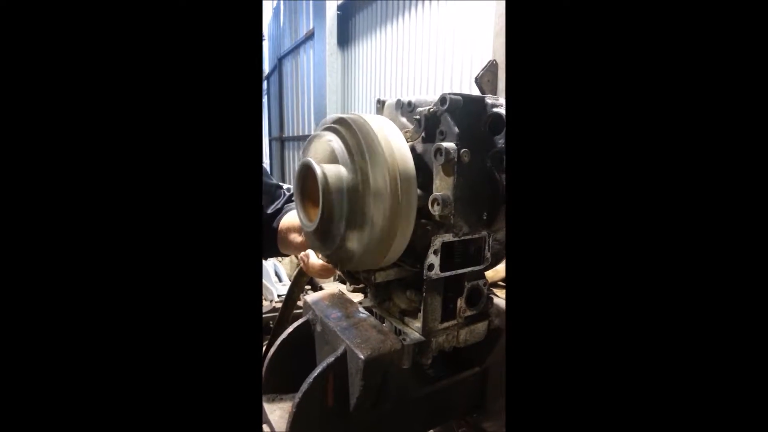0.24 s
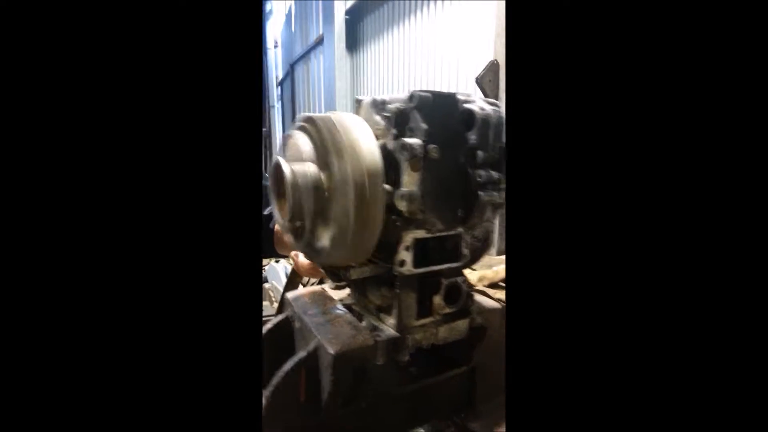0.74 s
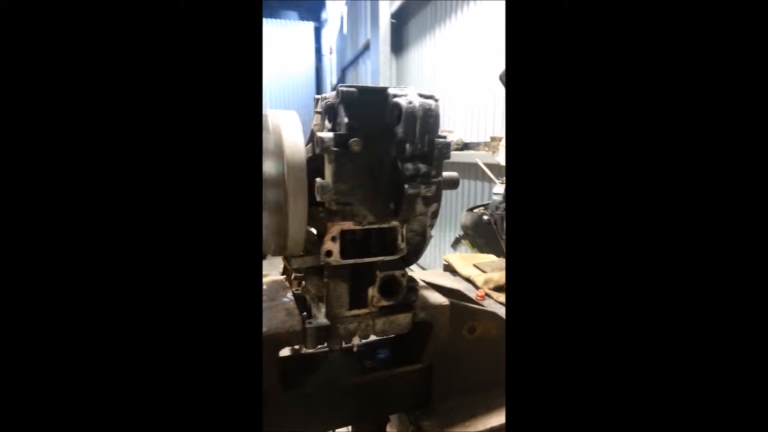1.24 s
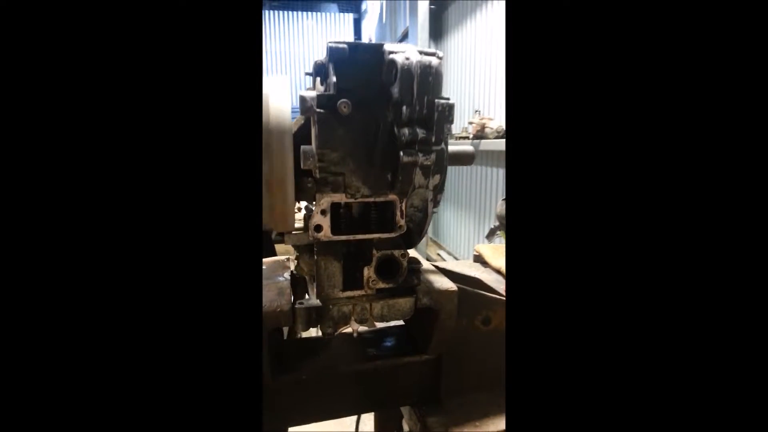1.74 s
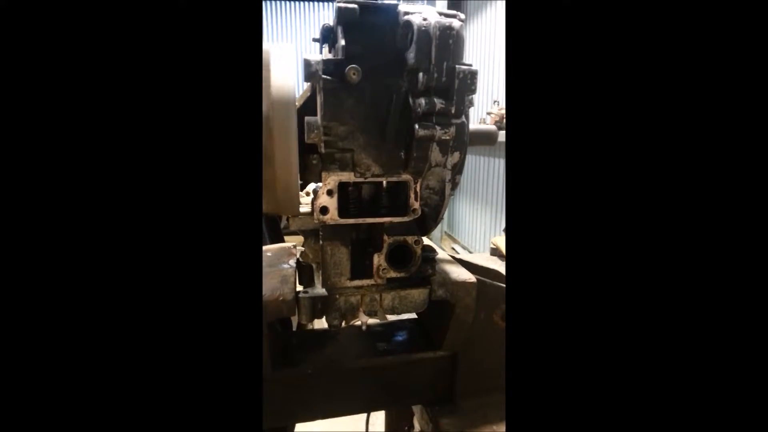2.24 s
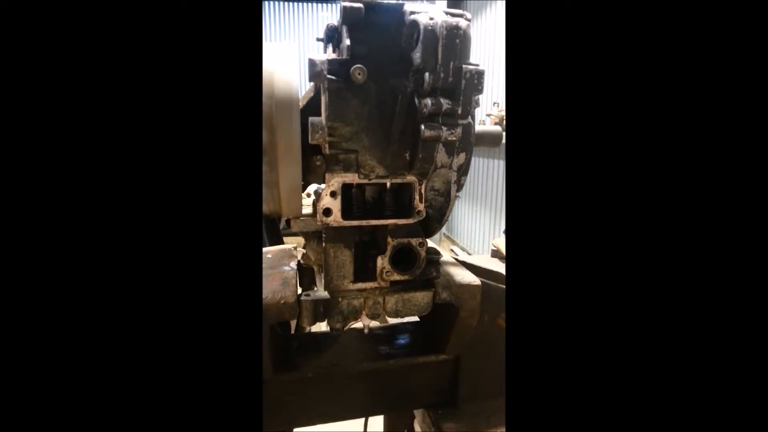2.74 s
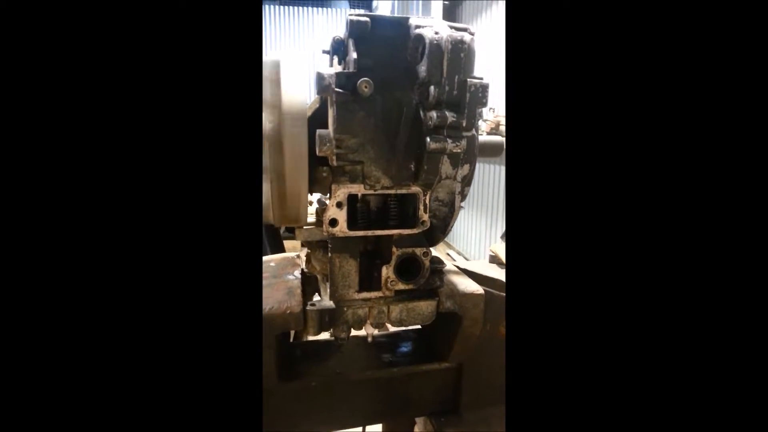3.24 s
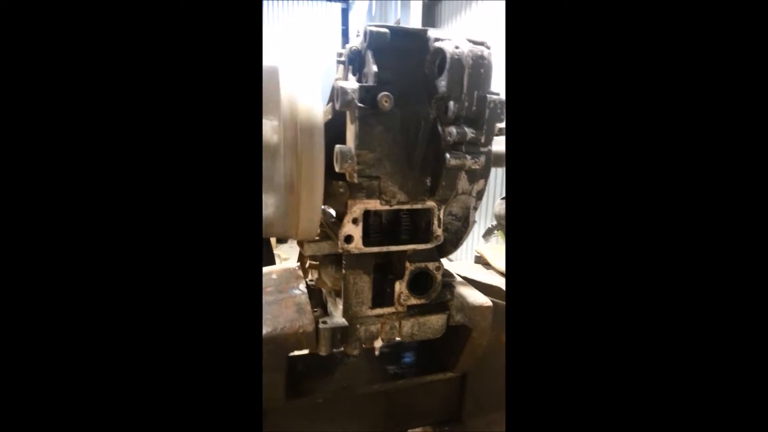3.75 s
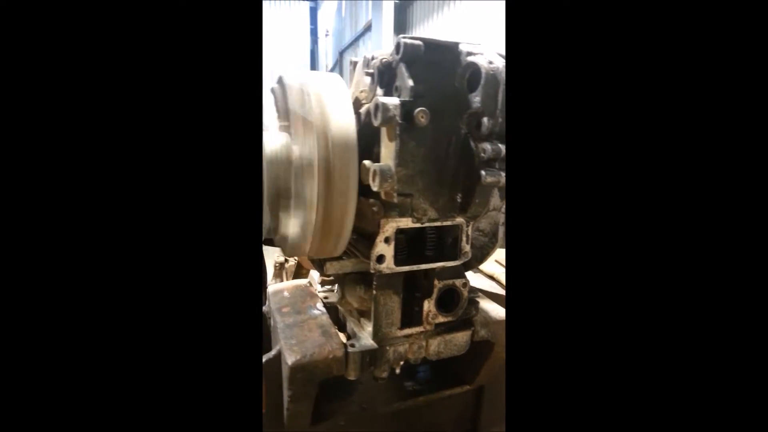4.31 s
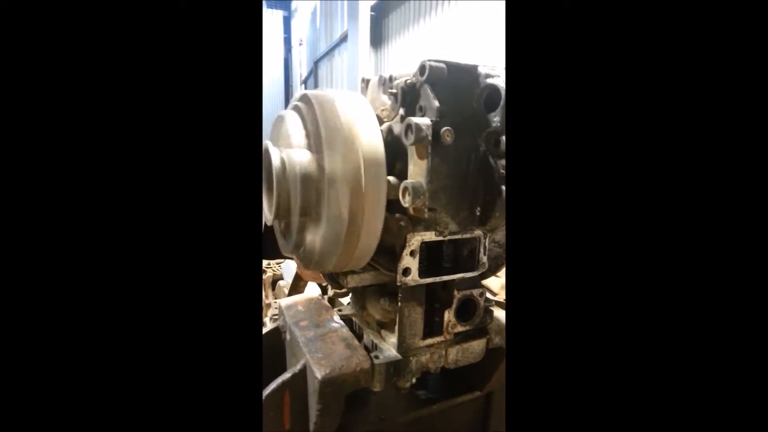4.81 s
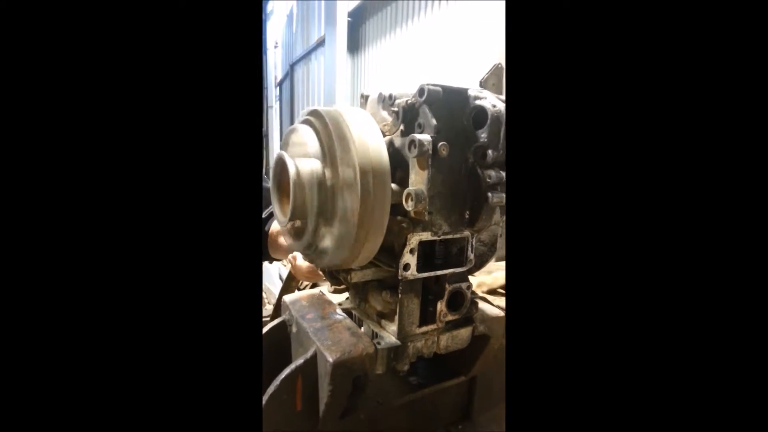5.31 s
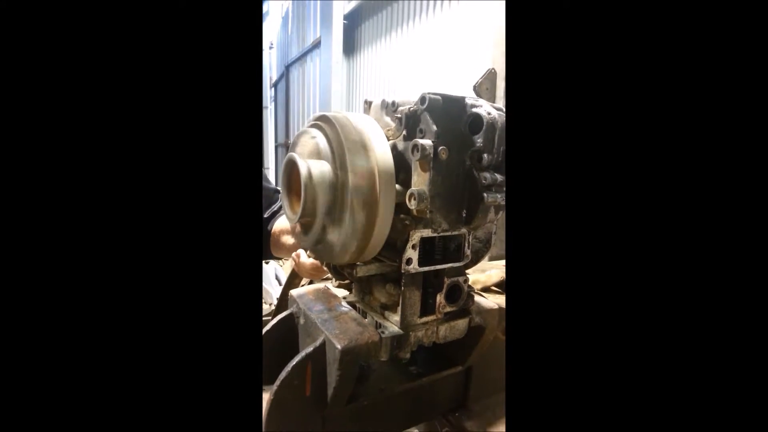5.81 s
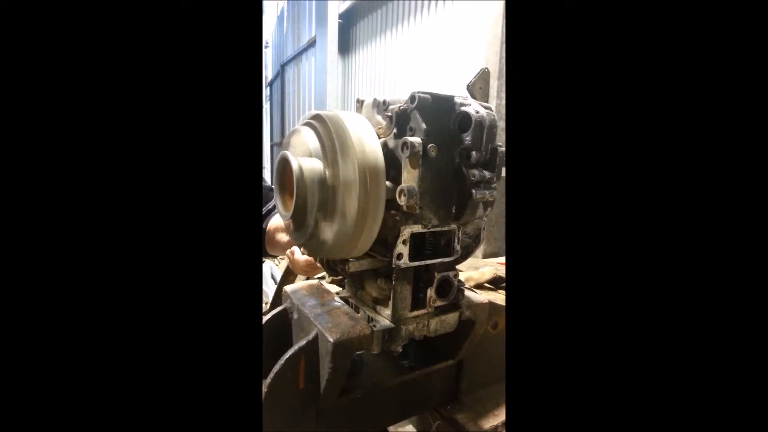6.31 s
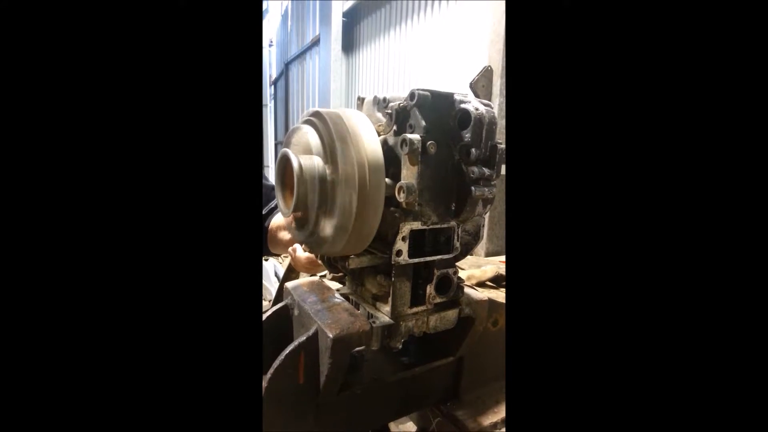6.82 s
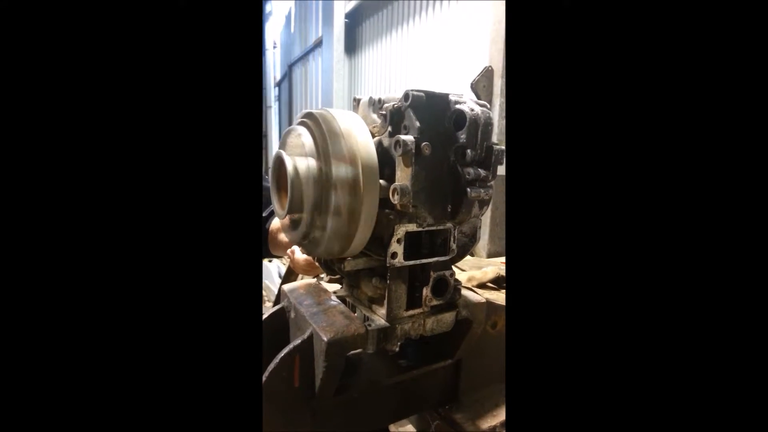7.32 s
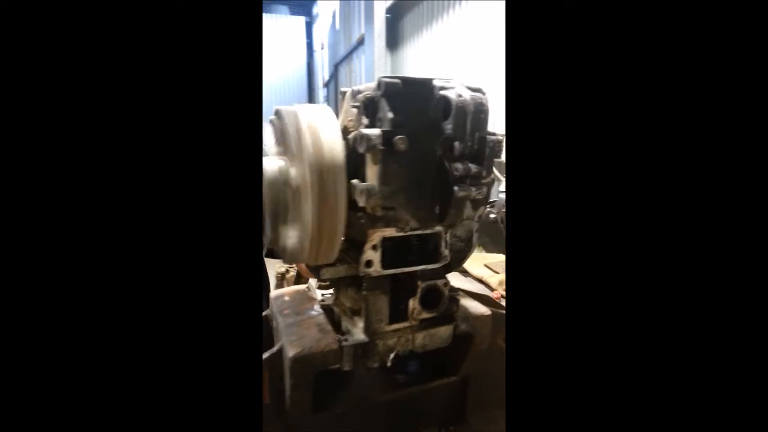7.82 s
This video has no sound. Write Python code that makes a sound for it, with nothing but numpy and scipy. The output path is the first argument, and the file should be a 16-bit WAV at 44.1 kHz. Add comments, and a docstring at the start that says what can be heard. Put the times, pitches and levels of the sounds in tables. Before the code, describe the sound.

Rapid, rhythmic bursts of hissing air from a turning engine in a tin shed, harsh and steady, with windy thumps midway as the microphone moves.

```python
"""Engine block turning on compressed air

A small single-cylinder engine block turns over steadily on compressed air in a tin shed.
In each four-stroke cycle four gusts of air hiss as shaped noise, ring the ports and whistle in a hollow.
Valve gear knocks decaying modes out of the block, and short echoes comb the sound.
The hand-held microphone swings to the open side, where puffs buffet it as low noise, and back to the flywheel.
"""
import sys
import numpy as np
from scipy import signal
from scipy.fft import rfft, irfft
from scipy.io import wavfile
from scipy.ndimage import uniform_filter1d, minimum_filter1d, map_coordinates

SR = 44100
rng = np.random.default_rng(int(sys.argv[2]) if len(sys.argv) > 2 else 0)


def wav_record(signal):
    """Record a signal, one row per channel, as 16-bit PCM in the file named by sys.argv[1]."""
    frames = np.transpose(np.atleast_2d(signal))
    bounded = np.clip(frames, -1, 1)
    # unit amplitude maps onto the largest positive 16-bit level
    quanta = np.round(bounded * 32767).astype(np.int16)
    wavfile.write(sys.argv[1], SR, quanta)


N = 355446
TIME = np.arange(N) / SR
WINDOW, HOP = 1024, 256  # short-time spectra [samples]
FRAMES = N // HOP + 5
BINS = np.fft.rfftfreq(WINDOW, 1 / SR)  # [Hz]


def amp(db):
    """Level law: decibels to amplitude gain."""
    return 10 ** (np.asarray(db) / 20)


def unit(x):
    """Normalization: scales a signal to rms 1."""
    return x / np.sqrt(np.mean(x ** 2) + 1e-20)


def over_time(table):
    """Linear interpolation of a (time, value) table at every sample."""
    return np.interp(TIME, *np.transpose(table))


def over_hz(table):
    """Interpolation over log frequency, one row for each column after the first."""
    hz, *columns = np.transpose(table)
    return np.array([np.interp(np.log(BINS + 1), np.log(hz + 1), column) for column in columns])


def humps(modes):
    """Resonance: the gain of steep-sided peaks, added in power."""
    power = 0
    for hz, width_hz, db in modes:
        gain = amp(db) / (1 + (2 * (BINS - hz) / width_hz) ** 2)
        power = power + gain ** 2
    return np.sqrt(power)


def white_spectra():
    """White noise: two unrelated sets of random short-time spectra."""
    z = rng.standard_normal((FRAMES, len(BINS), 4)).T
    return z[:2] + 1j * z[2:]


def to_sound(spectra):
    """Fourier synthesis: overlapping short-time spectra become a sound of rms 1."""
    sound = signal.istft(spectra, nperseg=WINDOW, noverlap=WINDOW - HOP)[1]
    return unit(sound[:, :N])


def eddies(rate_hz):
    """Turbulence: low-passed random wavering of rms 1, up to about the given rate."""
    hz = np.fft.rfftfreq(N, 1 / SR)
    spectrum = rfft(rng.standard_normal(N)) / (1 + (hz / rate_hz) ** 4)
    return unit(irfft(spectrum, N))


# Speed of the flywheel: (time [s], speed [turns per minute])
FLYWHEEL_SPEED = [(0, 510.6), (0.7, 509.1), (2.5, 515.7), (3.3, 514.1), (4.3, 516.6), (5.4, 514.0),
                  (6.1, 518.3), (6.6, 514.9), (8.06, 515.9)]
START_SHARE = 0.0334  # how far into its cycle the engine is at first [cycles]


def crank():
    """Four-stroke kinematics: cycles done so far, at two turns of the flywheel each."""
    return START_SHARE + np.cumsum(over_time(FLYWHEEL_SPEED)) / (2 * 60 * SR)


def opening(cycle, opens, attack, hold, release):
    """Valve lift: 0 shut to 1 open in every cycle; it lifts, dwells and seats again."""
    age = (cycle - opens) % 1
    rising = age / attack
    falling = (attack + hold + release - age) / release
    return np.clip(np.minimum(rising, falling), 0, 1)


# The four gusts of every cycle: (opens at [cycles], attack [cycles], hold [cycles], release [cycles],
# jet hiss [dB], port ring [dB], whistle [dB])
VALVE_GUSTS = [(-.018, 0.029, 0.06, 0.021, -5.5, -8, -15.5), (0.236, 0.034, 0.12, 0.06, -4.5, -7.5, -15.5),
               (.555, 0.016, 0.026, 0.013, -8.5, -13.5, -18), (0.721, 0.047, 0.076, 0.053, -4.5, -7.5, -14)]
GUST_SCATTER_DB, GUST_SLACK = 2.4, 0.21  # spread of strength [dB] and of timing [share of attack]
# Air leaking between the gusts until the supply shuts:
# (opens at [cycles], attack [cycles], hold [cycles], release [cycles])
SUPPLY_LEAK = (-.016, .012, 0.861, 0.136)
LEAK_DB, LEAK_SAG_DB, SEEP_DB = -12.5, -3, -18.5  # leak, its change over a cycle, and a constant seep [dB]
LEAK_PORT_DB, LEAK_WHISTLE_DB = -1.5, -16.5  # port ring and whistle relative to leak and seep [dB]
# The hollow starts to whistle once a cycle and is cut off:
# (opens at [cycles], attack [cycles], hold [cycles], release [cycles])
HOLLOW_WHISTLE = (0.328, 0.076, 0.174, 0.016)
WHISTLE_DB = -12.5


def flow(cycle):
    """Incoherent addition: leak, gusts and whistle sum in power to jet, port and whistle levels [dB]."""
    sag_db = LEAK_SAG_DB * ((cycle - SUPPLY_LEAK[0]) % 1)
    leak = amp(LEAK_DB + sag_db) * opening(cycle, *SUPPLY_LEAK)
    shares = amp([0, LEAK_PORT_DB, LEAK_WHISTLE_DB]) ** 2
    power = np.outer(shares, leak ** 2 + amp(SEEP_DB) ** 2)
    for opens, attack, hold, release, *levels_db in VALVE_GUSTS:
        # each gust keeps one random strength and lateness throughout
        chance = rng.standard_normal((int(cycle[-1]) + 3, 2))
        strength, late = chance[(cycle - opens + 1.5).astype(int)].T
        lift = opening(cycle - GUST_SLACK * attack * late, opens, attack, hold, release)
        power += np.outer(amp(levels_db), lift * amp(GUST_SCATTER_DB * strength)) ** 2
    power[2] += (amp(WHISTLE_DB) * opening(cycle, *HOLLOW_WHISTLE)) ** 2
    return 10 * np.log10(power)


# Microphone position: (time [s], position [0 at the flywheel to 1 at the open side])
MIC_SWING = [(0, 0), (.7, 0), (1.3, 0.27), (1.7, 0.55), (2.1, 0.808), (2.6, 0.78), (3.3, 0.8), (3.8, 0.63),
             (4.2, 0.305), (4.8, 0.12), (5.4, 0.089), (7.5, 0.021), (8.06, 0.18)]
# How the engine reaches the two ports of the microphone at each end of the swing:
# (frequency [Hz], level [dB], left minus right [dB], likeness [0-1], left lead [rad])
FLYWHEEL_PATH = [(300.0, -2.5, 2.5, 0, -1.1), (1300.0, 0.0, 0.4, 0.57, 1), (1800.0, -0.2, 8, 0.75, -0.14),
                 (2140, 1, 0.4, 0.36, -1.8), (3000, -0.5, -1.3, 0.56, -0.24), (3520, 1.2, 3.4, 0.79, -4),
                 (4050, -0.4, 1.5, 0.58, -4.5), (4530, 0.9, -0.4, 0.62, -5.5), (5550, 0.3, -2, 0.6, -6.0),
                 (6500, -1.2, -11, 0.28, -5), (7420, -1, -3.1, 0.65, -10.5), (8850, -0.6, -3.5, 0.25, -11),
                 (10200.0, -0.4, -2.5, 0.35, -16.5), (11000.0, 1.2, 1, 0.66, -17),
                 (12100, -1, -4.5, 0.2, -14.5), (14200, -1.5, -3.1, 0.57, -20)]
OPEN_SIDE_PATH = [(300.0, 2, -6, 0.05, 2), (1300.0, 1.4, 1, 0.74, 1.7), (1780, 2.5, 11, 0.97, -1.8),
                  (2190, 0.8, 2, 0.6, -1.7), (2900.0, -1, 0, 0.35, -3), (3500, -0.9, -2, 0.81, -5.5),
                  (3860, -0.7, -0.5, 0.23, -6.5), (4500, -3, -4, 0.25, -7.0), (5400.0, 6, -10, 0.65, -8.5),
                  (6500, 1.3, -11.5, 0.11, -7), (7260, 5, -0.8, 0.93, -14), (9000, 1.2, -3.5, 0.3, -16),
                  (10200.0, 1.2, -0.6, 0.11, -19.5), (11000.0, 1, -5, 0.29, -22.5),
                  (12000.0, 0.5, -5, 0.06, -19.2), (14400.0, 0.5, 0.5, 0.24, -14.5)]


def paths():
    """Interaural-type coherence: level, phase and likeness weights to two ports as the microphone swings."""
    swing = np.interp(np.arange(FRAMES) * HOP / SR, *np.transpose(MIC_SWING))
    near_flywheel = over_hz(FLYWHEEL_PATH)[..., None] * (1 - swing)
    near_open_side = over_hz(OPEN_SIDE_PATH)[..., None] * swing
    db, balance_db, likeness, lead = near_flywheel + near_open_side
    likeness = np.clip(likeness, 0, 1)
    right = amp(db) / np.sqrt(1 + amp(balance_db) ** 2)
    left = right * amp(balance_db)
    return left, right * likeness * np.exp(-1j * lead), right * np.sqrt(1 - likeness ** 2)


def rush(colour, path):
    """Turbulent jet noise of one colour: partly direct, partly scattered by the shed."""
    direct, scattered = white_spectra()
    left, right, right_scattered = path
    sides = np.array([left * direct, right * direct + right_scattered * scattered])
    return to_sound(colour[:, None] * sides)


def cylinder(drive, cycle_share, low_hz=1800, high_hz=5700, width_hz=700, top=0.17, spread=0.1333):
    """Cavity resonance: the space over the piston rings higher as it shrinks, twice a cycle."""
    from_top = (cycle_share - top + 0.25) % 0.5 - 0.25
    hz = low_hz + (high_hz - low_hz) * np.exp(-abs(from_top / spread) ** 6)
    # a gliding resonance: shift the drive down to 0 Hz, smooth it, shift it back
    carrier = np.exp(2j * np.pi * np.cumsum(hz) / SR)
    r = np.exp(-np.pi * width_hz / SR)
    ring = signal.lfilter([(1 - r) ** 2], [1, -2 * r, r * r], drive / carrier)
    return unit((carrier * ring).real)


# Colour of the escaping jet: (frequency [Hz], spectral density [dB per Hz])
JET_COLOUR = [(120.0, -56), (300.0, -36), (600.0, -10), (1100.0, -6.5), (1800.0, 2), (2600.0, -0.7),
              (3300.0, -0.15), (3800.0, -5.1), (4600.0, -13), (6000.0, 2), (7500.0, -3), (9500.0, -6),
              (12000.0, -7), (14500.0, -8)]
# Resonances of the open ports: (frequency [Hz], width [Hz], level [dB])
PORT_MODES = [(3957, 970, 0), (5234, 1160, -2), (6730, 1200, -5.5)]
# Resonances of the whistling hollow: (frequency [Hz], width [Hz], level [dB])
HOLLOW_MODES = [(1802, 350, 1), (4500, 470, -6)]
# Colour of the low push of a strong gust: (frequency [Hz], spectral density [dB per Hz])
PUSH_COLOUR = [(60, -40), (120, -23), (190, -2.5), (450, 3.5), (900, -8), (1800, -5.5), (3000, -31)]


def air(cycle_share, jet_db, port_db, whistle_db, push_db=-14, choke_db=-6, lump_db=3):
    """Flow-excited resonance: gusts hiss, ring the cylinder and the ports, and blow across the hollow."""
    path = paths()
    jet_colour = amp(over_hz(JET_COLOUR)[0])
    ring = amp(-14) * cylinder(rush(jet_colour, path), cycle_share)
    jet = amp(jet_db) * (rush(jet_colour, path) + ring)
    ports = amp(port_db) * rush(humps(PORT_MODES), path)
    whistle = amp(whistle_db) * rush(humps(HOLLOW_MODES), path)
    # the low push grows with the cube of the flow until the port chokes, so strong gusts carry it
    push_level_db = push_db + 3 * np.minimum(jet_db, choke_db) + lump_db * eddies(20)
    push = amp(push_level_db) * rush(amp(over_hz(PUSH_COLOUR)[0]), path)
    flutter = amp(0.9 * eddies(200))
    return (jet + ports + whistle + push) * flutter


# Knocks of the valve gear in every cycle: (time [share of the cycle], relative force [dB])
VALVE_KNOCKS = [(.036, -31), (0.301, -23), (0.346, -28.5), (.408, -28.5), (.585, -27.5), (0.809, -33.5)]
# What the block rings with: (frequency [Hz], relative level [dB], t60 [s])
BLOCK_MODES = [(231, -36, 0.031), (351, -0.5, 0.079), (502, -0.5, 0.037), (745, -2, 0.036),
               (1050, 4, 0.025)]


def valve_gear(cycle):
    """Modal impact: cams and tappets knock the block near fixed crank angles, never twice quite alike."""
    scatter_db, slack_s = 2.2, 0.0007  # spread of force and of timing
    share, force_db = np.transpose(VALVE_KNOCKS)
    due = (np.arange(int(cycle[-1]) + 1)[:, None] + share).ravel()
    times = np.interp(due[due < cycle[-1]], cycle, TIME)
    chance = rng.standard_normal((len(times), 2 + 2 * len(BLOCK_MODES)))
    at = np.clip(np.round((times + slack_s * chance[:, 0]) * SR).astype(int), 0, N - 1)
    force = amp(np.resize(force_db, len(times)) + scatter_db * chance[:, 1])
    t = np.arange(SR // 4) / SR
    swell = 1 - np.exp(-t / 0.0022)  # the casting takes a moment to start ringing
    out = np.zeros((2, N))
    for k, (hz, db, t60) in enumerate(BLOCK_MODES):
        # every knock strikes each mode differently on each side
        grip = 0.22 + 0.5 * chance[:, 2 + 2 * k:4 + 2 * k].T
        blows = np.zeros((2, N))
        blows[:, at] = force * grip
        mode = swell * amp(db - 60 * t / t60) * np.sin(2 * np.pi * hz * t)
        out += signal.oaconvolve(blows, mode[None], axes=1)[:, :N]
    return out


# Echoes off the bench and the tin walls:
# (delay at the flywheel [s], delay at the open side [s], gain [amplitude ratio])
WALL_ECHOES = [(.0024, 0.0023, 0.12), (.0049, 0.0063, -0.076), (.0074, .0066, .11), (.0089, .0101, 0.12)]


def walls(x):
    """Comb filtering: near echoes interfere with the sound; the comb slides as the microphone moves."""
    swing = over_time(MIC_SWING)
    out = x.copy()
    for flywheel_s, open_side_s, gain in WALL_ECHOES:
        delay_s = flywheel_s + (open_side_s - flywheel_s) * swing
        sent = (TIME - delay_s) * SR
        out += gain * np.array([map_coordinates(side, [sent], order=3) for side in x])
    return out


PUFF_AT, PUFF_WIDTH = 0.31, 0.12  # strongest point of the first of two puffs, half width [cycles]
PUFF_DB, LULL_DB = -21.5, -38  # puff and the lull between, before the draught's strength is added


def puffs(cycle, jet_db, gust_db=-26, wander_db=3.5):
    """Piston displacement: the draught [dB] swells on each turn of the crank, and a little in every gust."""
    from_peak = (cycle - PUFF_AT + 0.25) % 0.5 - 0.25
    swell = amp(PUFF_DB) * np.exp(-(from_peak / PUFF_WIDTH) ** 2)
    gust = amp(jet_db + gust_db)
    lull = amp(LULL_DB + wander_db * eddies(15))
    return 10 * np.log10(swell ** 2 + gust ** 2 + lull ** 2)


# Puffs that hit the microphone squarely: (start [s], relative peak [dB], left minus right [dB])
SQUARE_BUFFETS = [(1.582, -17, 16), (1.697, -17, 9), (1.808, -21, 4), (1.956, -10.5, 13),
                  (2.292, -11.5, 12), (2.373, -23, 7), (2.429, -13, 16), (2.497, -20.5, 19),
                  (2.87, -21, 13), (3.054, -12.5, 11), (3.215, -18, 18), (3.569, -20, 12), (4.675, -22, 1),
                  (7.698, -19, -2)]
# Colour of wind on the microphone: (frequency [Hz], spectral density [dB per Hz])
WIND_COLOUR = [(20, -34), (50, -15), (85, -12), (170, -1), (350, 0), (600, -1.5), (1200, -7.5), (3000, -45)]


def draught(level_db, lump_db=3.0, lean_db=7, buffet_s=0.005, buffet_db=-7):
    """Wind pseudo-sound: lumpy noise unrelated at the two ports, leaning left, with a few hard buffets."""
    sides = np.array([[0.5], [-0.5]])
    strength = amp(level_db + lump_db * eddies(60) + sides * lean_db - 6.5)
    for start_s, db, balance_db in SQUARE_BUFFETS:
        # each buffet peaks buffet_s after its start
        age = np.maximum(TIME - start_s, 0) / buffet_s
        pulse = age * np.exp(1 - np.minimum(age, 50))
        strength = strength + amp(db + buffet_db + sides * balance_db) * pulse
    return strength * to_sound(white_spectra() * amp(over_hz(WIND_COLOUR)).T)


# Strength of the draught where the microphone is held: (time [s], relative level [dB])
DRAUGHT_STRENGTH = [(0, -30), (1.1, -29), (1.5, 2), (2.4, 3), (3.3, 3.5), (3.9, -1), (4.3, -9), (6.8, -26),
                    (8.06, -16)]


def scene():
    """Superposition: the crank angle drives the layers, which add at the microphone."""
    cycle = crank()
    jet_db, port_db, whistle_db = flow(cycle)
    wind = draught(puffs(cycle, jet_db) + over_time(DRAUGHT_STRENGTH))
    engine = air(cycle % 1, jet_db, port_db, whistle_db) + valve_gear(cycle)
    return walls(engine) + wind


def bass_of(x):
    """Zero-phase crossover: what lies under 450 Hz."""
    return signal.sosfiltfilt(signal.butter(3, 450, fs=SR, output="sos"), x, axis=1)


def record(dry):
    """Peak limiting: holds the treble of the loudest moments near full scale; then a band limit."""
    treble = dry - bass_of(dry)
    room_left = np.minimum(1, 1.02 / (abs(treble) + 1e-9))
    lowest = minimum_filter1d(room_left, size=11, axis=1)
    gain = uniform_filter1d(lowest, size=11, axis=1)
    excess = treble * (1 - gain)
    held = dry - (excess - bass_of(excess))  # the bass passes untouched
    low_pass = signal.firwin(511, 14650, window=("kaiser", 8), fs=SR)  # edge [Hz]
    return signal.oaconvolve(held, low_pass[None], "same", axes=1)


dry = scene()
out = record(dry)
wav_record(out)
```